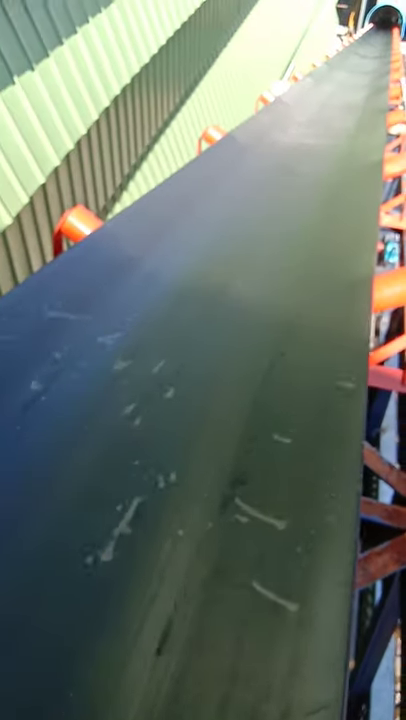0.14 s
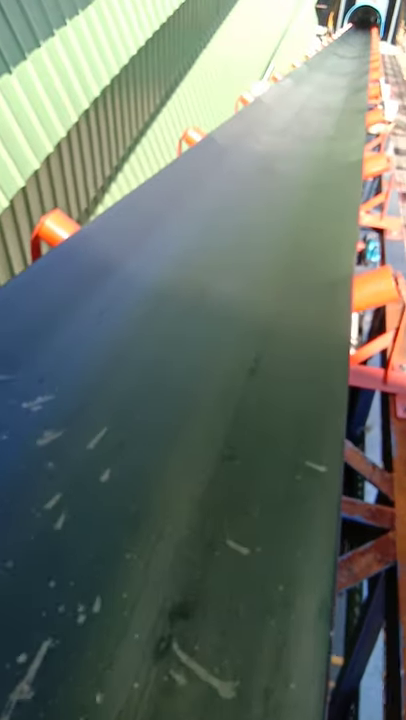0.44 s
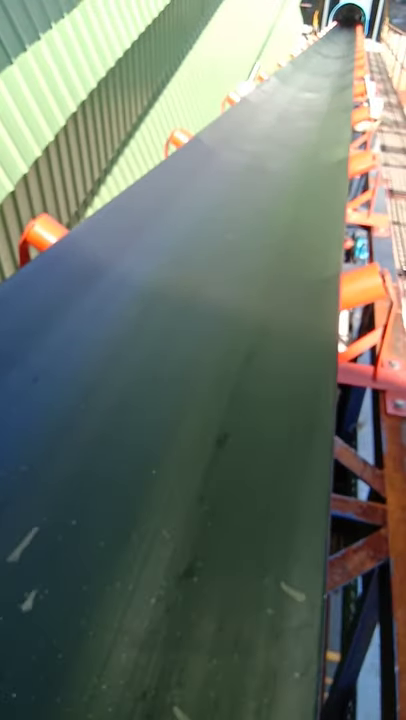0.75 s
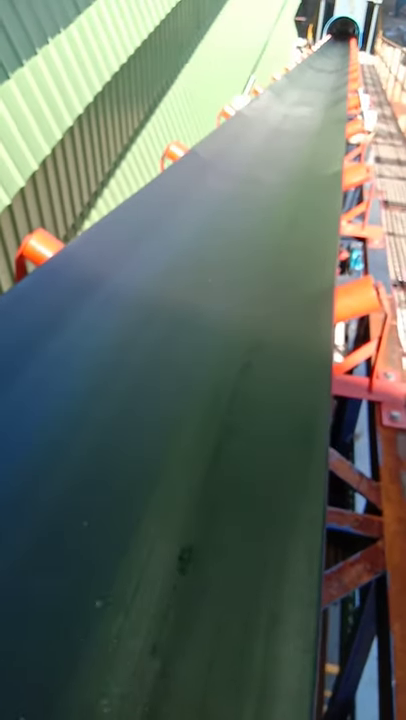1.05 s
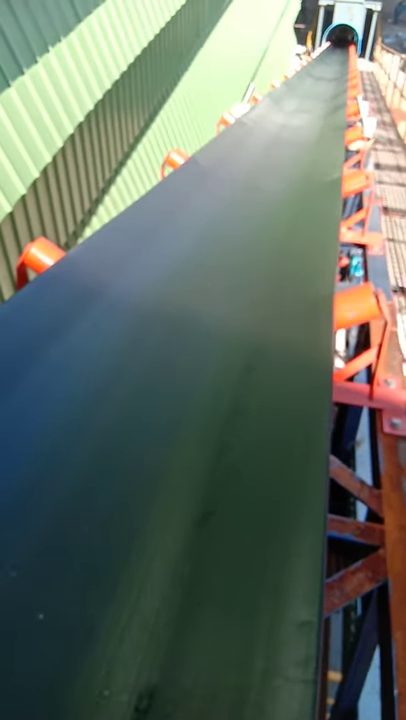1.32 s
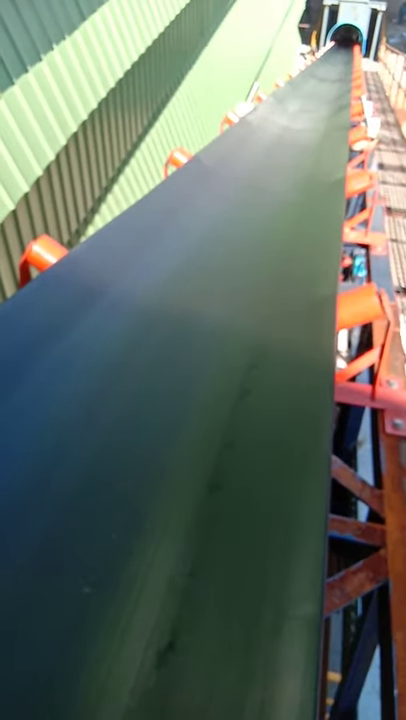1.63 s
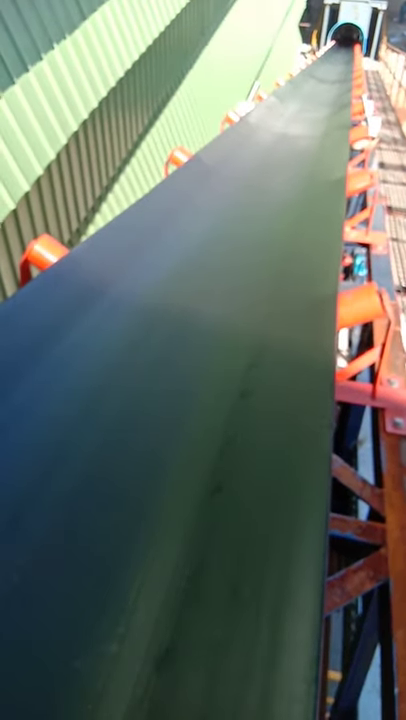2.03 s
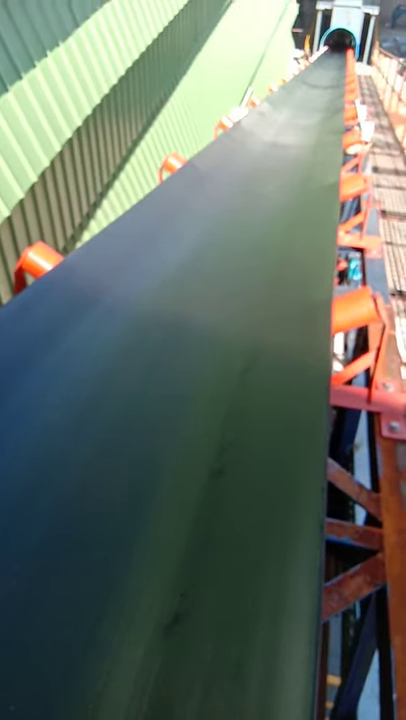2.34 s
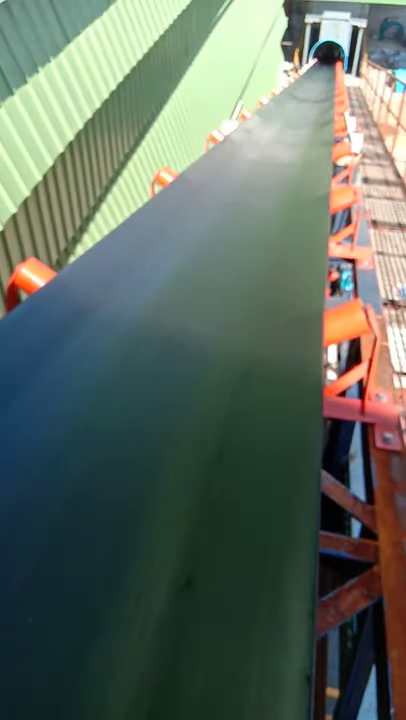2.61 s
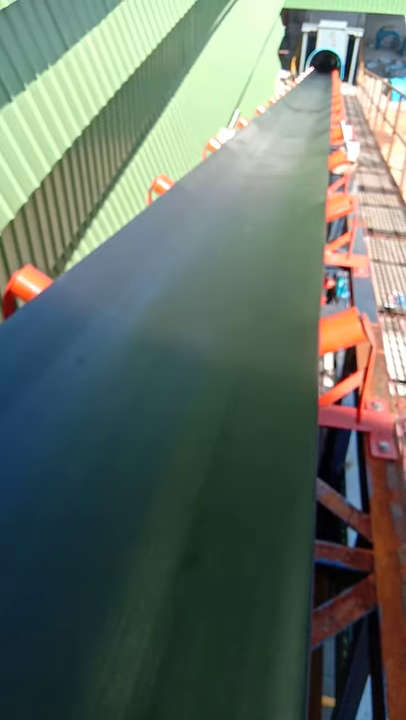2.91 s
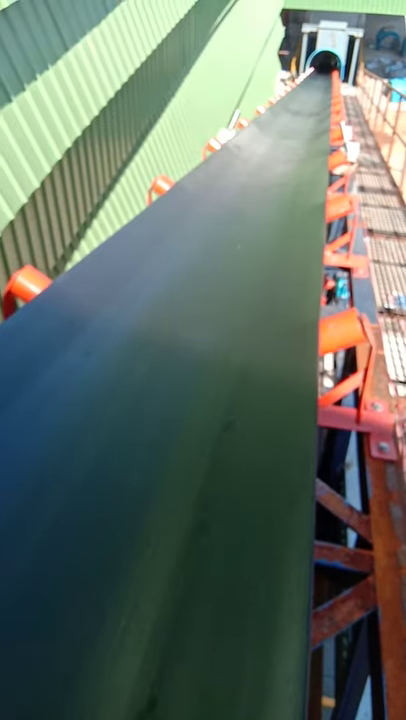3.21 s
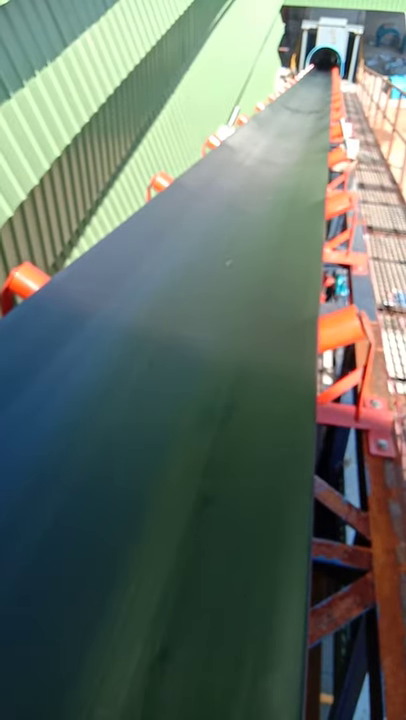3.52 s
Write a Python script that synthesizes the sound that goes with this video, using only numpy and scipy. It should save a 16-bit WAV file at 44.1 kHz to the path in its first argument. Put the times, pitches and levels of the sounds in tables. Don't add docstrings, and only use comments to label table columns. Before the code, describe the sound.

A conveyor belt runs continuously for about 3.6 seconds, its steel rollers giving a low wavering hum with blurred overtones. The deep hum is strong until about 1.9, dips around 2.0-2.6, then swells again near 2.9, with a higher hum around 3.0-3.5. Frame rumble and soft rubber hiss stay steady. Faint grit scrapes come at 0.1, 0.7 and 2.0, a sharper crunch at 2.4. Close, outdoors, left louder.

```python
import sys
import numpy as np
from scipy import signal
from scipy.fft import rfft, irfft
from scipy.io import wavfile

SR = 44100
rng = np.random.default_rng(int(sys.argv[2]) if len(sys.argv) > 2 else 0)


def field_ratio(decibels):
    return 10 ** (np.asarray(decibels, dtype=float) / 20)


def file_out(sig):
    cols = np.atleast_2d(sig).T
    lim = np.clip(cols, -1, 1)
    pcm = np.round(lim * 32767).astype(np.int16)
    wavfile.write(sys.argv[1], SR, pcm)


N = 161406
T = np.arange(N) / SR
HZ = np.maximum(np.fft.rfftfreq(N, 1 / SR), 1)


def rms_one(x):
    return x / np.sqrt(np.mean(x ** 2) + 1e-20)


def at_hz(points, hz, axis=1):
    points = np.array(points)
    return np.interp(np.log(hz), np.log(points[:, 0]), points[:, axis])


def drift(rate_hz):
    hop = 40
    pole = np.exp(-2 * np.pi * rate_hz * hop / SR)
    white = rng.standard_normal(N // hop + 2002)
    slow = signal.lfilter([1], [1, -2 * pole, pole * pole], white)[2000:]
    slow = rms_one(slow - slow.mean())
    return np.interp(np.arange(N) / hop, np.arange(len(slow)), slow)


def patchy_noise(spectrum, patch_db, top_db=0):
    white = rfft(rng.standard_normal(N)) * field_ratio(at_hz(spectrum, HZ)) * np.sqrt(SR / 2)
    white = white * np.clip(HZ / spectrum[0][0], 0, 1) ** 3
    white = white * np.clip(spectrum[-1][0] / HZ, 0, 1) ** 3
    place = np.clip(2 * np.log2(HZ / 30), 0, 19)
    together = drift(7.7)
    out = 0
    for k in range(20):
        share = np.clip(1 - abs(place - k), 0, 1)
        is_top = 30 * 2 ** (k / 2) > 6000
        swing_db = patch_db + top_db * is_top
        out = out + irfft(white * share, N) * field_ratio(swing_db * (together + drift(24.0)))
    return out


TONES_HZ = [98.05, 195.4, 131.3, 393.0, 293.5, 262.6]
# (time [s], half width [s], level [dB])
SWELLS = [
    [(.2, 0.38, -31), (1.0, 0.4, -30), (1.8, 0.58, -29.5), (2.0, .1, -40), (2.3, 0.21, -38.5),
     (2.55, .12, -42), (2.85, 0.27, -31), (3.65, 0.17, -35.5)],
    [(1.4, 2.6, -33), (.05, .1, -44), (.65, 0.1, -44), (1.08, 0.19, -31.5), (2.2, 0.18, -42),
     (3.05, 0.22, -30), (3.44, 0.062, -29.5), (3.65, 0.18, -33)],
    [(.3, .5, -66.5), (1.6, 0.35, -36), (2.1, 0.3, -35), (2.55, 0.28, -42), (3.6, 0.21, -38.5)],
    [(.01, 0.6, -38.5), (.8, 0.14, -32), (1.35, .07, -43), (1.8, 0.2, -33), (2.08, 0.081, -37),
     (2.32, 0.064, -38), (2.65, 0.3, -35), (3.25, 0.11, -45), (3.49, 0.076, -31.5)],
    [(.2, 0.28, -41.5), (1.9, 0.11, -38.5), (3.2, 0.94, -41.5)],
    [(2.7, 0.86, -42)],
]
# (time [s], offset from pitch [Hz])
SLIP = [
    (0, .6),
    (1.2, .4),
    (1.4, -.8),
    (2.1, -.8),
    (2.3, .3),
    (3.66, .1),
]


def roller_tones():
    slip_phase = 2 * np.pi * np.cumsum(np.interp(T, *np.transpose(SLIP))) / SR
    out = 0
    for hz, swells in zip(TONES_HZ, SWELLS):
        height = 0
        for time, width, db in swells:
            height = height + field_ratio(db) * np.exp(-((T - time) / width) ** 2)
        wander = 0.2 * hz / TONES_HZ[0] * drift(1.0)
        phase = 2 * np.pi * hz * T + wander
        if hz == TONES_HZ[1]:
            phase = phase + slip_phase
        out = out + np.sqrt(2) * height * np.sin(phase)
    return out


OVERTONES_HZ = [201, 262.5, 293.5, 490, 525, 587, 657, 688, 833, 978, 1174, 1318]
# (width [Hz], level [dB])
OVERTONES = [(30, -43.5), (4, -54), (5, -45), (6, -50), (8, -48), (7, -48), (6, -50), (7, -49), (6, -53),
             (7, -53), (9, -51.5), (8, -56)]


def overtones():
    white = rfft(rng.standard_normal(N))
    out = 0
    for hz, (width, db) in zip(OVERTONES_HZ, OVERTONES):
        resonance = 1 / (1 + ((HZ - hz) / width * 2) ** 2)
        out = out + field_ratio(db) * rms_one(irfft(white * resonance, N))
    return out


# (frequency [Hz], density [dB per Hz])
RUMBLE = [(32, -74), (52, -79), (90, -54), (180, -53), (400, -56.5), (750, -60.5), (1250, -65.5),
          (2200, -74)]
# (centre [Hz], width [Hz], gain [dB])
HOLLOWS = [(39, 6, -5), (50, 9, 6), (112, 14, -3.5), (152, 22, -2.5), (228, 14, -3.5), (450, 40, -1)]


def rumble():
    gain_db = sum(db * np.exp(-((HZ - hz) / width) ** 2) for hz, width, db in HOLLOWS)
    return irfft(rfft(patchy_noise(RUMBLE, patch_db=.25)) * field_ratio(gain_db), N)


# (frequency [Hz], density [dB per Hz])
HISS = [(1000, -73), (2000, -77.5), (3200, -79), (5000, -82.5), (6800, -86), (8200, -94), (9500, -106),
        (11000, -116)]


def rubber_hiss():
    return patchy_noise(HISS, patch_db=.3, top_db=.9)


# (frequency [Hz], density [dB per Hz])
AIR = [(8000, -109), (10000, -108), (11800, -110), (13000, -107.5), (14800, -107), (15400, -110)]


def air_floor():
    return patchy_noise(AIR, patch_db=.5)


# (time [s], level [dB], length [s], level of its shrill edge [dB])
GRIT = [
    (.095, -54.5, .03, -68),
    (.69, -57, .035, -74),
    (1.62, -60, .02, -76),
    (2.012, -55, .028, -67),
    (2.4275, -41, .02, -53),
    (2.452, -49, .034, -57.5),
    (2.65, -59, .04, -74),
    (3.17, -57, .02, -74),
    (3.5, -60, .03, -74),
]
# (frequency [Hz], gain [dB])
GRIT_COLOUR = [(2500, -12), (4500, 0), (7500, -1), (9800, -10), (11000, -15), (11800, -26), (15400, -30)]
# (frequency [Hz], gain [dB])
SHRILL = [(11000, -40), (12000, -14), (12900, 0), (13600, -5), (14600, -9), (15400, -14)]


def grit():
    attack_s, grains_per_s = .002, 7000
    clicks = (rng.random(N) < grains_per_s / SR) * rng.standard_normal(N)
    grains = rfft(clicks) * (HZ > 1500)
    body = rms_one(irfft(grains * field_ratio(at_hz(GRIT_COLOUR, HZ)), N))
    edge = rms_one(irfft(grains * field_ratio(at_hz(SHRILL, HZ)), N))
    out = 0
    for time, db, length, edge_db in GRIT:
        age = np.maximum(T - time, 0)
        envelope = (1 - np.exp(-age / attack_s)) * np.exp(-(age / length) ** 2)
        out = out + (field_ratio(db) * body + field_ratio(edge_db) * edge) * envelope
    return out


# (frequency [Hz], loss [dB], phase lead [rad], level of unrelated sound [dB])
SHADE = [(170, 3.5, .21, -28), (400, 6, .17, -21), (750, 9.1, .04, -18), (1300, 7, -.01, -14),
         (2000, 7.8, .03, -10), (5200, 7.6, .06, -3.5), (7000, .5, .05, -16), (11000, .01, .01, -6)]


def right_microphone(left, steady):
    lag = 41
    late = np.exp(1j * (at_hz(SHADE, HZ, axis=2) - 2 * np.pi * HZ * lag / SR))
    own = field_ratio(at_hz(SHADE, HZ, axis=3))
    own_roar = rfft(steady[::-1])
    right = (rfft(left) * late + own * own_roar) / np.sqrt(1 + own ** 2)
    return irfft(right * field_ratio(-at_hz(SHADE, HZ)), N)


def scene():
    steady = rumble() + rubber_hiss() + air_floor()
    left = roller_tones() + overtones() + steady + grit()
    return np.array([left, right_microphone(left, steady)])


def band_limit(x):
    return signal.sosfilt(signal.butter(12, 15540, fs=SR, output="sos"), x)


def record(dry):
    fade_s = .004
    fade = np.clip(np.minimum(T, T[-1] - T) / fade_s, 0, 1)
    return band_limit(dry * fade)


dry = scene()
out = record(dry)
file_out(out)
```